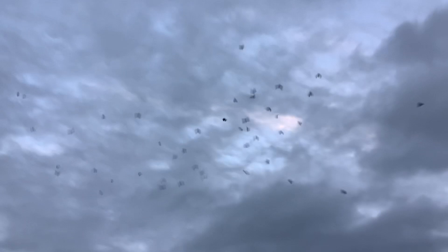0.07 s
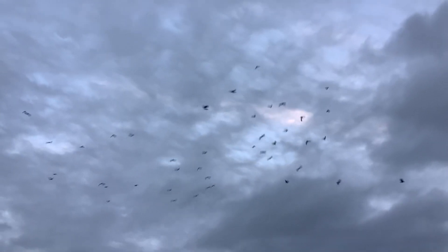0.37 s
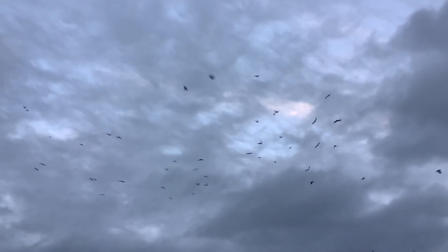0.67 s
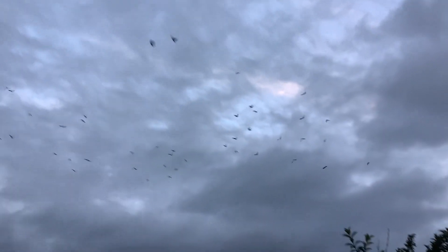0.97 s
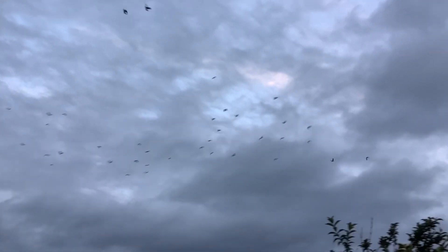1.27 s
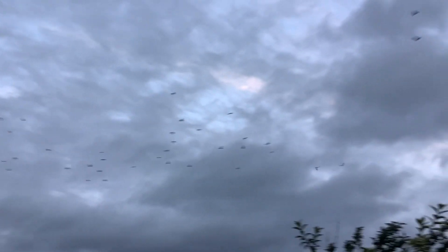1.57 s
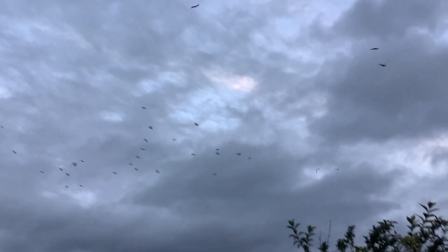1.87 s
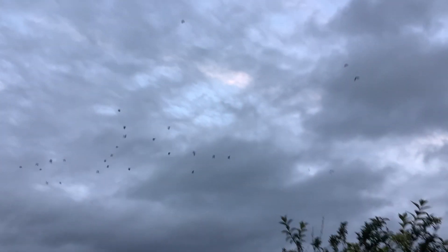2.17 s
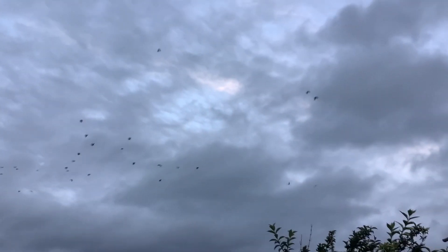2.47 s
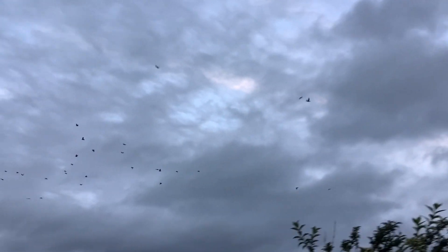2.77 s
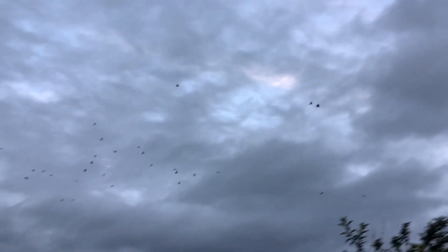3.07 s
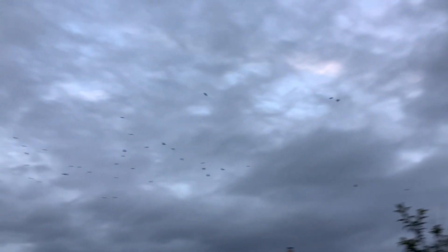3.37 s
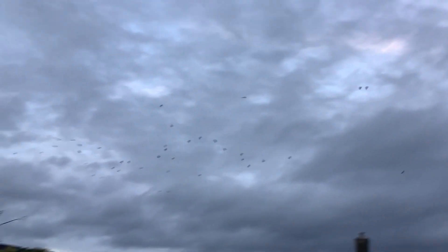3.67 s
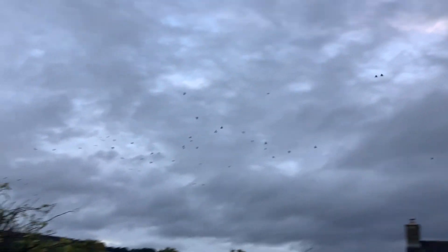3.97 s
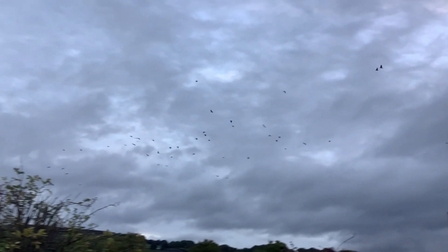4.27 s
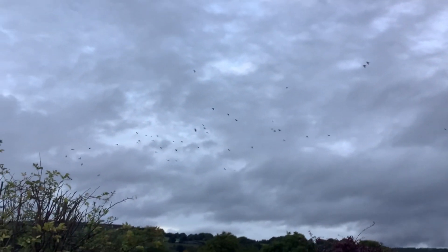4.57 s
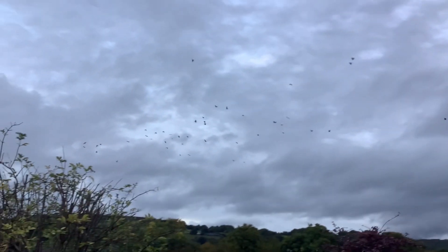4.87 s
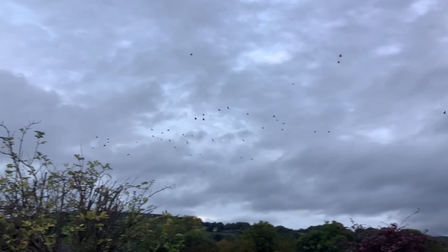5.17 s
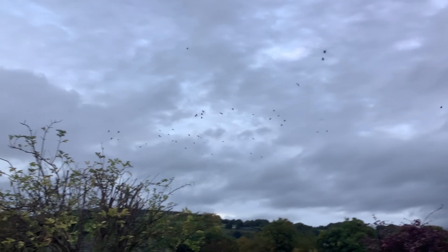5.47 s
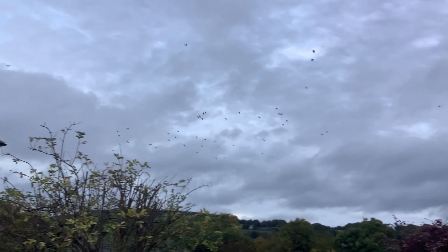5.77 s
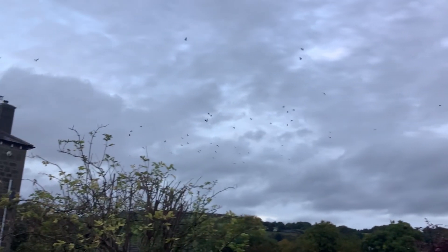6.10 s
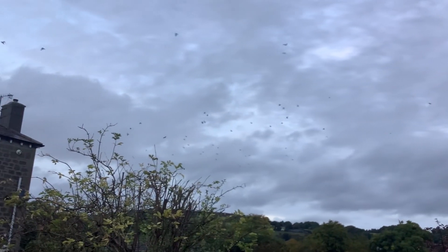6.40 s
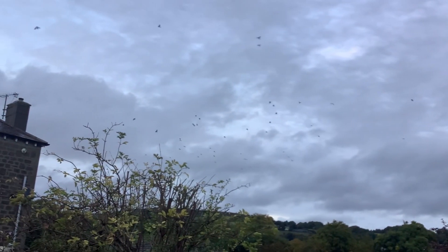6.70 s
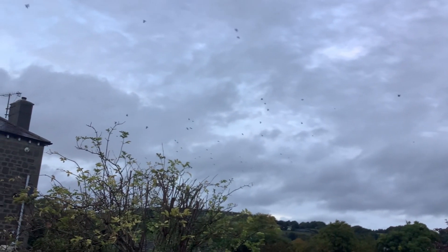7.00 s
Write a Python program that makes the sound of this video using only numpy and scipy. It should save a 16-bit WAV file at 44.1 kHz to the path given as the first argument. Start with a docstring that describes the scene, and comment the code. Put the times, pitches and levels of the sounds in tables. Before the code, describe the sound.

Clipped, raspy jackdaw calls overlap outdoors, near and far, above light rumbling wind and occasional handling knocks.

```python
"""Jackdaws wheel over gardens at dusk. From the start, above light wind and the chatter of farther birds,
come short 'tchak' calls, falling harmonic tones that break into rasp, and lower, fainter echoes from
walls and trees. At about 0.6 s a hand rubs and knocks the camera case, then again near 2 s and 4 s.
A distant engine swells at 3.3 s and once more at 4.7 s; the calls and soft low bumps go on to the end."""
import sys
import numpy as np
from scipy import signal
from scipy.fft import rfft, irfft
from scipy.io import wavfile

SR = 44100
rng = np.random.default_rng(int(sys.argv[2]) if len(sys.argv) > 2 else 0)


def dump(signal):
    """Clip the signal to [-1, 1] and save it as 16-bit WAV at the path in sys.argv[1]."""
    limited = np.clip(np.atleast_2d(signal).T, -1, 1)
    pcm = np.round(limited * 32767).astype(np.int16)
    wavfile.write(sys.argv[1], SR, pcm)


N = 314874

# Levels in the tables are relative; each source applies its own gain.
# Spectrum of wind and open air: frequency_hz, level_db
AIR_SPECTRUM = [(20, -36), (36, -28), (46, -0.5), (54, 2), (66, 4), (95, -4), (125, -7), (300, -12.5),
                (480, -15.5), (630, -13), (790, -15), (1200, -16), (2400, -25.5), (3200, -35), (8000, -40),
                (15500, -45)]
# Swells of the distant engine: start_s, length_s, level_db
ENGINE_SWELLS = [(3.276, 0.89, -51), (4.71, 1.43, -51.5)]
# Soft bumps of the hand and puffs of wind: start_s, length_s, pitch_hz, peak_db
BUMPS = [(0.026, 0.17, 59.7, -45), (0.215, 0.15, 56.6, -45.5), (.935, 0.039, 163, -49.5),
         (1.519, 0.13, 59, -42.5), (1.91, 0.028, 165, -48), (3.225, 0.19, 61.2, -47.5),
         (4.263, 0.16, 60.2, -42.5), (5.77, 0.023, 141, -48), (6.36, 0.13, 60, -44.5),
         (7.052, 0.1, 59, -46)]
# Slides of the fingers on the case: start_s, length_s, level_db
RUBS = [(0.426, 0.39, -56), (0.793, 0.23, -59.5), (2.078, 0.1, -51.5), (3.965, 0.091, -58),
        (4.279, 0.11, -56), (6.245, 0.34, -69.5)]
# Spectrum of friction on the case: frequency_hz, level_db
FRICTION_SPECTRUM = [(300, 35.5), (1500, 12), (3500, -20), (5000, 9), (7500, 19), (10000, 10.5), (15000, 2)]
# Knocks on the case: start_s, level_db, tilt_db_per_octave, delay_at_1khz_s
KNOCKS = [(0.5794, -0.5, -3, 0.0015), (2.1376, -8, -2, 0.00128), (3.9021, -17.5, -4.5, 0.0016),
          (3.917, -9.5, 1, 0.0016), (3.995, -20.5, -3.5, 0.00108), (4.4414, -12, 4.5, 0.0011)]
# Response of the struck case: frequency_hz, gain_db
CASE_RESPONSE = [(40, -14.5), (130, -14), (300, -5), (470, -5), (630, -3), (1100, -9), (1900, -7),
                 (2500, -11), (3100, -13), (4200, -20.5), (7500, -28.5), (10000, -38.5), (15000, -56)]
# Reverberation time of the gardens: frequency_hz, t60_s
GARDEN_DECAY = [(500, 0.68), (2000, 0.4), (5000, 0.63), (10000, 0.35)]
# Colour of the sound scattered by trees: frequency_hz, gain_db
LEAF_RESPONSE = [(800, 7.5), (1600, 6.5), (2500, 4), (4700, 4), (7000, -2), (12000, 6)]
# Resonances of a bird's throat: frequency_hz, gain_db
THROAT_RESPONSE = [(700, -15.5), (1200, -7), (1650, -2), (2100, 2.5), (2600, -1.5), (3050, -21),
                   (3700, -20.5), (4700, -21), (5800, -20.5), (6800, -33.5), (9000, -33.5), (11000, -49),
                   (14000, -58)]
# Spectrum of the breath noise in a call: frequency_hz, level_db
RASP_SPECTRUM = [(600, -24), (1200, 13), (1700, 10.5), (2500, -4.5), (3100, -15.5), (3800, -5), (4800, -2),
                 (5900, -14), (6800, -7), (9000, -18.5), (11000, -17), (15000, -51)]
# Envelope of one call, dying away beyond share 1: share_of_length, tone_db, rasp_db
CALL_ENVELOPE = [(0, 9, -17), (.15, 1, -23), (.45, 1.5, -9), (.7, 1, -0.5), (1, -8, -0.5),
                 (1.25, -8.5, -10.5), (1.6, -19, -29)]
# Underlying loudness of the far birds: time_s, level_db
CHATTER_LEVEL = [(0, -51.5), (.7, -61.5), (1.5, -68.5), (2.1, -74), (3.3, -63), (4.2, -56.5), (4.8, -77),
                 (5.4, -52.5), (6.1, -73), (6.8, -56.5), (7.14, -78)]
# Jackdaw calls and the lower, fainter echoes that follow them:
# start_s, length_s, start_pitch_hz, level_db, upper_harmonics_db, beak_hz, rasp_db
CALLS_AND_ECHOES = [(0.034,0.034,1209,-51.5,2.5,4570,-60), (0.069,0.034,1374,-58.5,-1,4670,-59.5),
                    (0.123,0.047,1308,-46,-1.5,4650,-55), (0.247,0.04,1274,-59,-8,4960,-61),
                    (0.434,0.048,1323,-46,4,4460,-54.5), (0.481,0.031,1342,-47.5,3.5,4730,-59),
                    (.52,0.065,1127,-45.5,-8,4430,-54), (0.604,.03,1232,-50,3,4770,-55.5),
                    (0.68,0.049,1239,-51.5,1.5,4600,-55.5), (0.704,0.042,1290,-57,-1,4680,-72),
                    (.755,.06,751,-57.5,-6,4800,-73), (0.877,0.044,1072,-62.5,-0.5,4460,-62),
                    (0.984,0.065,1268,-48.5,-1,4700,-59), (1.055,0.053,798,-51.5,-1.5,4760,-58),
                    (1.149,0.044,1295,-50.5,0.5,4660,-65), (1.307,0.043,1234,-56.5,0.5,3440,-77),
                    (1.366,.055,740,-56.5,-9,4560,-72), (1.669,.054,1132,-63,-1.5,4360,-64),
                    (1.732,0.062,1022,-74,4.5,3900,-67.5), (2.098,.046,1305,-49.5,-1,4470,-55.5),
                    (2.269,0.063,1142,-51.5,-4.5,4730,-67), (2.323,0.033,1247,-50,-6,4800,-59.5),
                    (2.362,0.048,937,-51.5,-14,4830,-62.5), (2.467,0.04,1292,-55,-1,4870,-66.5),
                    (2.506,0.035,1045,-58.5,-4,4640,-63), (2.712,.034,1276,-52,4,4070,-56),
                    (2.748,0.036,1104,-52.5,-9,4100,-57), (2.948,0.036,1307,-71,10,4960,-68.5),
                    (3.046,0.034,1290,-48.5,-5,4700,-63), (3.1,.046,1304,-53,-0.5,4800,-61),
                    (3.15,0.041,957,-56,-1.5,4830,-64), (3.188,0.026,1067,-59.5,2.5,4580,-60.5),
                    (3.341,0.048,1175,-65.5,5,4900,-69), (3.424,0.037,1187,-55,-2,5250,-56.5),
                    (3.536,0.056,1212,-55,0.5,4700,-62.5), (3.665,0.054,934,-65,-10,4770,-71),
                    (3.762,.06,1362,-50.5,2.5,5260,-86), (3.931,0.025,1280,-55.5,3,4770,-63),
                    (4.056,0.055,1240,-50,-3.5,4940,-76), (4.092,0.048,1123,-52,-1,4900,-80),
                    (4.196,0.026,1622,-55,1.5,4430,-70), (4.32,.058,1346,-51,-0.5,5530,-57.5),
                    (4.372,0.042,1310,-49.5,1,5330,-59), (4.447,0.036,1347,-51.5,-3,5650,-71),
                    (4.725,.034,1340,-58.5,-10,5240,-76), (4.76,.038,1231,-51,-3,5370,-60.5),
                    (4.993,.047,1216,-59.5,1.5,3450,-84), (5.052,0.035,892,-63,-27,4500,-84),
                    (5.161,0.048,1344,-63,-9,6100,-59.5), (5.19,0.04,924,-60,1,6000,-65.5),
                    (5.253,0.047,1192,-52,-6.5,5830,-69), (5.342,.043,1131,-55,-2.5,6330,-66),
                    (5.468,0.037,1340,-44,4,5840,-51), (5.52,0.036,1185,-51,0.5,5550,-66),
                    (5.62,0.064,1401,-51.5,-4.5,5700,-60.5), (5.696,0.048,1056,-63,1,5400,-68),
                    (5.921,0.043,1200,-58.5,1.5,4700,-60), (6.091,0.049,1403,-57.5,-5.5,6700,-75),
                    (6.239,.046,1227,-56,3.5,5560,-64.5), (6.272,0.038,1294,-54,-1,5600,-63),
                    (6.302,0.041,1216,-50,-5,5440,-57.5), (6.476,0.036,1364,-56.5,-3.5,5230,-67),
                    (6.545,0.038,1220,-58.5,-15,4560,-82), (6.627,0.043,1329,-51,2,5060,-69),
                    (6.699,0.049,1344,-52.5,-14,5000,-77), (6.708,0.065,1130,-58,-10,5150,-77),
                    (7.063,0.033,1260,-60,-14,4700,-82)]


def amp(db):
    """Decibels to amplitude ratio."""
    return 10 ** (np.asarray(db) / 20)


def unit_rms(x):
    """Normalisation to rms 1."""
    return x / np.sqrt(np.mean(x ** 2) + 1e-20)


def at_hz(points, hz):
    """Interpolation on a log-frequency axis."""
    f, value = np.transpose(points)
    return np.interp(np.log(hz + 1), np.log(f + 1), value)


def follow(curve):
    """Linear interpolation of a time curve at every sample."""
    return np.interp(np.arange(N) / SR, *np.transpose(curve))


def add(mix, start_s, sound):
    """Superposition of a sound on the mix."""
    part = mix[max(round(start_s * SR), 0):][:len(sound)]
    part += sound[:len(part)]


def noise(spectrum):
    """Spectral shaping of white noise, rms 1."""
    gain = amp(at_hz(spectrum, np.fft.rfftfreq(N, 1 / SR)))
    return unit_rms(irfft(rfft(rng.standard_normal(N)) * gain, N))


def wander(rate_hz, size=N):
    """Random fluctuation by low-pass filtering of noise, rms 1."""
    hz = np.fft.rfftfreq(size, 1 / SR)
    return unit_rms(irfft(rfft(rng.standard_normal(size)) / (1 + (hz / rate_hz) ** 4), size))


def wind(level_db=-54.5, swell_db=0.47):
    """Broadband noise: a low, slightly wavering rumble of wind under a faint hiss."""
    return amp(level_db + swell_db * wander(12.4)) * noise(AIR_SPECTRUM)


def engine(pitch_hz=78, waver_hz=0.32, rise_s=0.22, fall_s=0.31):
    """Amplitude modulation of one low tone: a far drone swells, holds and dies away."""
    t = np.arange(N) / SR
    level = sum(amp(db) * np.clip(np.minimum((t - start) / rise_s, (start + length - t) / fall_s), 0, 1)
                for start, length, db in ENGINE_SWELLS)
    return level * np.sin(2 * np.pi * np.cumsum(pitch_hz + waver_hz * wander(1.45)) / SR)


def bumps():
    """Tone bursts: the hand and puffs of wind give a few low cycles that sag in pitch."""
    out = np.zeros(N)
    for start, length, hz, db in BUMPS:
        t = np.arange(int(length * SR)) / SR
        phase = 2 * np.pi * hz * t * (1.06 - 0.06 * t / length)
        add(out, start, amp(db) * np.hanning(len(t)) * np.sin(phase))
    return out


def rubs(grain_db=2, grain_hz=126):
    """Sliding friction: a grainy hiss follows the pressure of the fingers on the case."""
    pressure = np.zeros(N)
    for start, length, db in RUBS:
        add(pressure, start, amp(db) * signal.windows.tukey(int(length * SR), .6))
    return pressure * noise(FRICTION_SPECTRUM) * amp(grain_db * wander(grain_hz))


def knocks(gain_db=15, bounce=0.16, bounce_s=0.004, scuff_db=-40, scuff_s=0.0036):
    """Dispersion of bending waves in the case: treble arrives first, so a knock is a falling chirp."""
    out, scuff = np.zeros((2, N))
    hz = np.fft.rfftfreq(4096, 1 / SR)
    for start, db, tilt, delay_s in KNOCKS:
        group_delay = delay_s * (1300 / (hz + 300)) ** 1.354
        phase = -2 * np.pi * np.cumsum(group_delay) * hz[1]
        octaves = np.log2(np.clip(hz, 100, 2000) / 1000)
        magnitude = amp(gain_db + db + at_hz(CASE_RESPONSE, hz) + tilt * octaves)
        knock = np.fft.fftshift(irfft(magnitude * np.exp(1j * phase)))
        begin = start - len(knock) / 2 / SR  # the chirp lies mid-buffer
        add(out, begin, knock)
        add(out, begin + bounce_s, bounce * knock)
        add(scuff, start, amp(db + scuff_db) * np.exp(-np.arange(len(knock)) / SR / scuff_s))
    return out + scuff * noise(FRICTION_SPECTRUM)


def garden_echoes(sound, scatter_db=-7, wall_db=-14, house_db=-14, onset_s=0.0055, walls=5):
    """Reflection and scattering: each place in the sky has its own wall echoes and tail from trees."""
    t = np.arange(SR // 2) / SR
    taps = rng.choice([-1., 1.], len(t)) * (rng.random(len(t)) < 1500 / SR)
    taps *= 1 - np.exp(-t / onset_s)
    hz, age_s, spectra = signal.stft(taps, SR, nperseg=256)
    gain_db = at_hz(LEAF_RESPONSE, hz)[:, None] - 60 * age_s / at_hz(GARDEN_DECAY, hz)[:, None]
    response = signal.istft(spectra * amp(gain_db), SR, nperseg=256)[1]
    response *= amp(scatter_db) / np.linalg.norm(response)
    for delay, loss in rng.random((walls, 2)):
        response[int((.002 + .03 * delay) * SR)] += amp(wall_db - 4.3 * loss)
    response[int(rng.uniform(.035, .075) * SR)] += amp(house_db)  # a house front repeats the call
    return signal.fftconvolve(sound, response)


def tchak(length_s, start_hz, end_hz, bend, fundamental_db, upper_db, beak_hz, rasp_db, tilt,
          jitter=0.015, shimmer=0.15, droop=0.419):
    """Source and filter: harmonics fall through throat and beak resonances and break into rasp."""
    def beak_db(hz):
        """A 9 dB resonance, with a treble tilt in dB per octave."""
        return 9 / (1 + ((hz - beak_hz) / 430) ** 2) + tilt * np.log2(np.maximum(hz / 4500, 1))

    size = 6144
    progress = np.arange(size) / SR / length_s
    share, tone_curve_db, rasp_curve_db = np.transpose(CALL_ENVELOPE)
    hoarseness = np.clip((rasp_db + 8) / 10, 0, 1.2)  # raspy birds are unsteady from the start
    roughness = np.minimum(0.055 + 1.15 * hoarseness + 0.73 * progress, 2.1)  # the voice loses its grip
    glide = start_hz + (end_hz - start_hz) * np.minimum(progress, 1) ** bend  # 1 straight, 2 arched
    glide *= np.exp(-droop * np.maximum(progress - 1, 0))
    pitch = glide * (1 + jitter * roughness * wander(600, size))
    phase = 2 * np.pi * np.cumsum(pitch) / SR

    k = np.arange(1, 10)[:, None]
    # each upper harmonic swells and sinks on its own
    sway_db = 5 * np.sin(2 * np.pi * (rng.uniform(0.5, 2.23, k.shape) * progress + rng.random(k.shape)))
    tightness = max(start_hz / 1370, 1)  # a high yelp comes from a tighter throat
    harmonic_db = at_hz(THROAT_RESPONSE, k * pitch / tightness) + beak_db(k * pitch)
    harmonic_db += fundamental_db * (k == 1) + (upper_db + sway_db) * (k > 2)
    tone = (amp(harmonic_db) * np.cos(k * phase)).sum(0)
    tone *= 1 + shimmer * roughness * wander(950, size)
    tone *= amp(np.interp(progress, share, tone_curve_db))

    puffs = rng.standard_normal(size) * (1 + 0.97 * np.cos(phase))  # air escapes once a cycle
    hz = np.fft.rfftfreq(size, 1 / SR)
    rasp = unit_rms(irfft(rfft(puffs) * amp(at_hz(RASP_SPECTRUM, hz) + beak_db(hz))))
    rasp *= amp(rasp_db + np.interp(progress, share, rasp_curve_db))
    fade = np.clip(progress * 5.25, 0, 1) * np.clip((share[-1] - progress) * 5, 0, 1)
    return fade * (tone + rasp)


def chatter_envelope(echo_db=-9, echo_s=0.043):
    """Incoherent sounds add in power: over the chatter, a brief wash of echoes follows each call."""
    lag = np.arange(SR) / SR / echo_s
    power = amp(follow(CHATTER_LEVEL)) ** 2
    for start, _, _, db, *_ in CALLS_AND_ECHOES:
        add(power, start, (amp(db + echo_db) * lag * np.exp(1 - lag)) ** 2)
    return np.sqrt(power)


def far_chatter(calls_per_s=21, direct_gain=0.67, places=5):
    """Superposition of random falling calls, dulled by distance: far birds and the wash of echoes."""
    groups = np.zeros((places, N))
    calls = int(calls_per_s * N / SR)
    for i, (when, long, high, fall, gape) in enumerate(rng.random((calls, 5))):
        pitch = 800 + 360 * high
        call = tchak(.04 + .03 * long, pitch, pitch * (.64 + 0.124 * fall), bend=1.1, fundamental_db=0,
                     upper_db=-8, beak_hz=4200 + 1400 * gape, rasp_db=-16, tilt=-1)
        add(groups[i % places], (i + when) / calls * N / SR, call)
    flock = sum(direct_gain * group + garden_echoes(group)[:N] for group in groups)
    return unit_rms(flock) * chatter_envelope()


def jackdaws(gain_db=3.5, usual_db=-51, usual_beak_hz=4890, usual_s=0.044, end_ratio=0.7):
    """Direct and reverberant sound: calls and their echoes, the fainter ones with more reverberation."""
    out = np.zeros(N)
    for start, length, pitch, db, upper_db, beak_hz, rasp_db in CALLS_AND_ECHOES:
        excess_db = db - usual_db
        gape = np.log2(beak_hz / usual_beak_hz)  # a wider gape raises the beak resonance
        fundamental_db = -0.5 - 0.22 * excess_db - 12 * gape  # hard, wide-open calls are thin
        bend = 1.85 + 0.7 * np.log2(length / usual_s)  # long calls hold their pitch before they drop
        call = amp(db + gain_db) * tchak(length, pitch, pitch * end_ratio, bend, fundamental_db,
                                         upper_db, beak_hz, rasp_db - db + 1, tilt=6.5 * gape)
        add(out, start, call)
        add(out, start, garden_echoes(call) * amp(-0.38 * excess_db))
    return out


def scene():
    """Linear superposition of birds, wind, engine and hand in one channel."""
    return (jackdaws() + far_chatter() + wind() + engine() + knocks() + bumps() + rubs())[None]


def record(dry, low_cut_hz=40, high_cut_hz=15800):
    """Band limiting: the microphone opens after a moment and sheds deep rumble and the top treble."""
    opened = dry * follow([(.031, 0), (.035, 1)])
    high_pass = signal.butter(4, low_cut_hz, "high", fs=SR, output="sos")
    low_pass = signal.firwin(511, high_cut_hz, window=("kaiser", 9), fs=SR)
    return signal.oaconvolve(signal.sosfilt(high_pass, opened), low_pass[None], "same")


dry = scene()
out = record(dry)
dump(out)
```